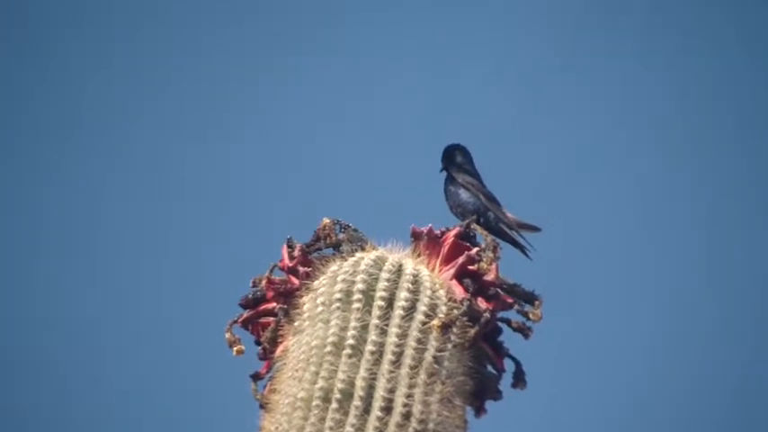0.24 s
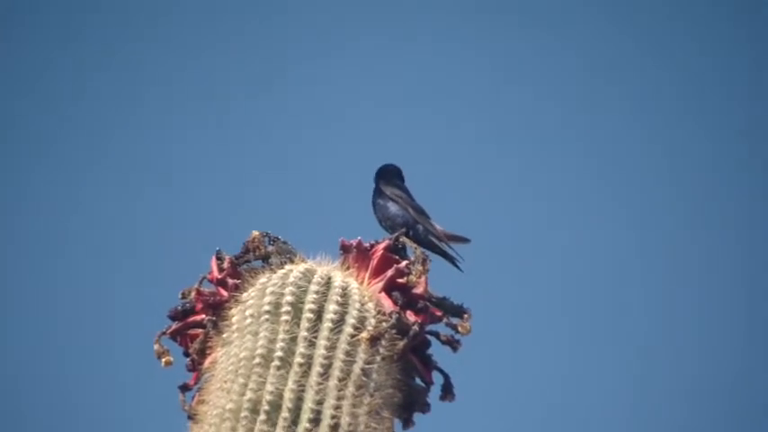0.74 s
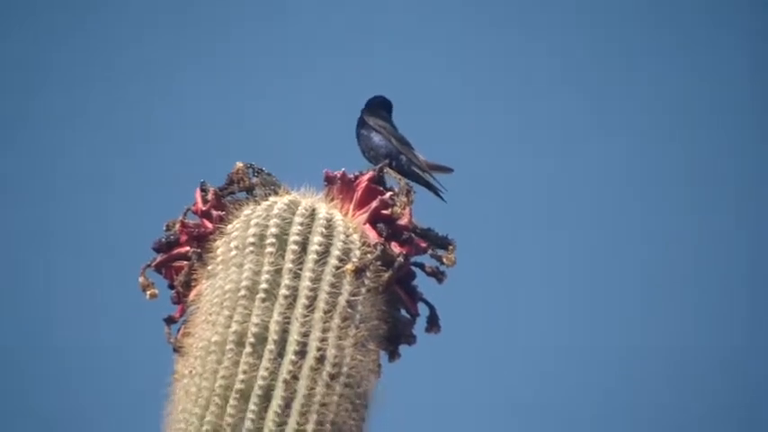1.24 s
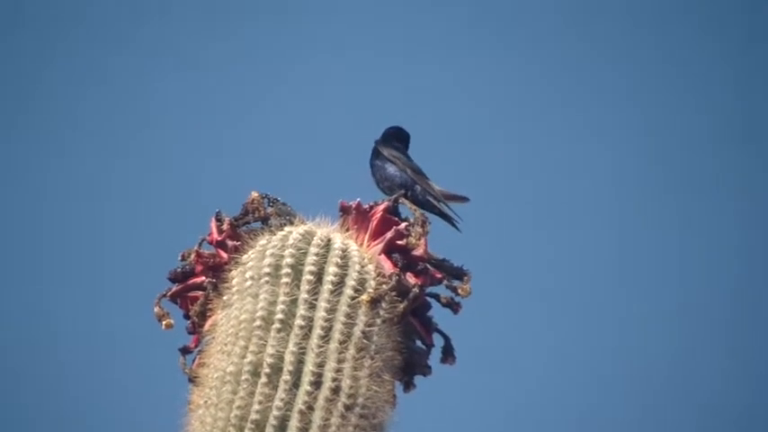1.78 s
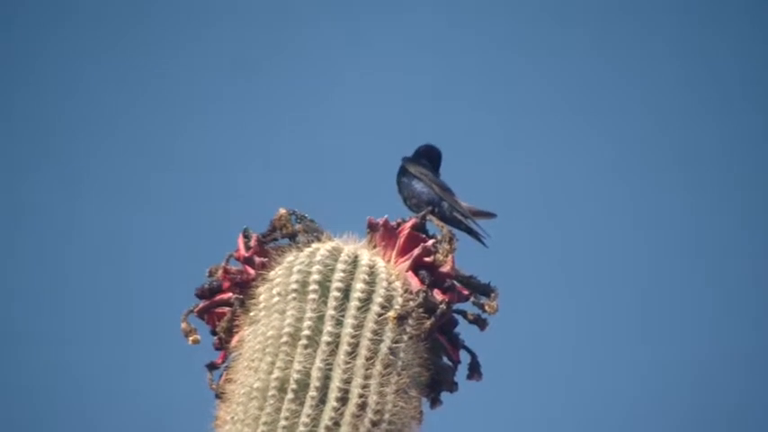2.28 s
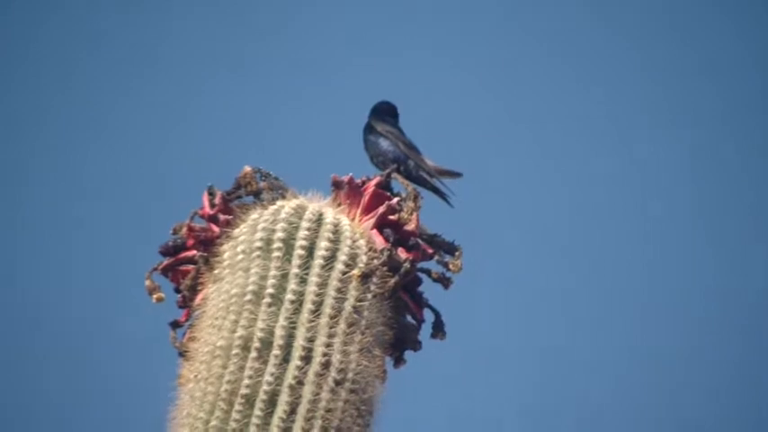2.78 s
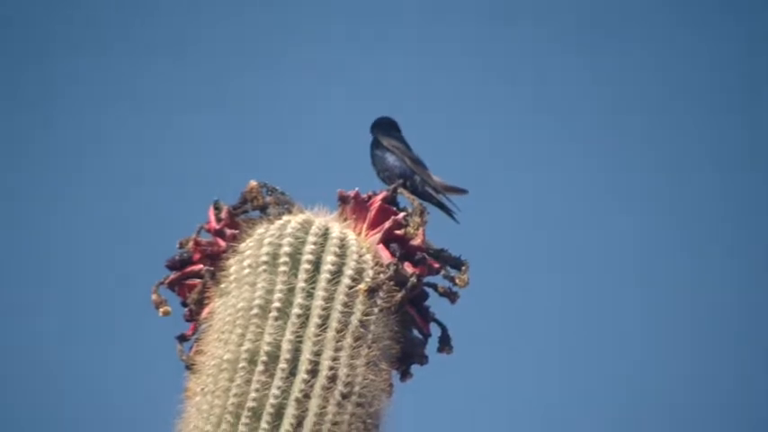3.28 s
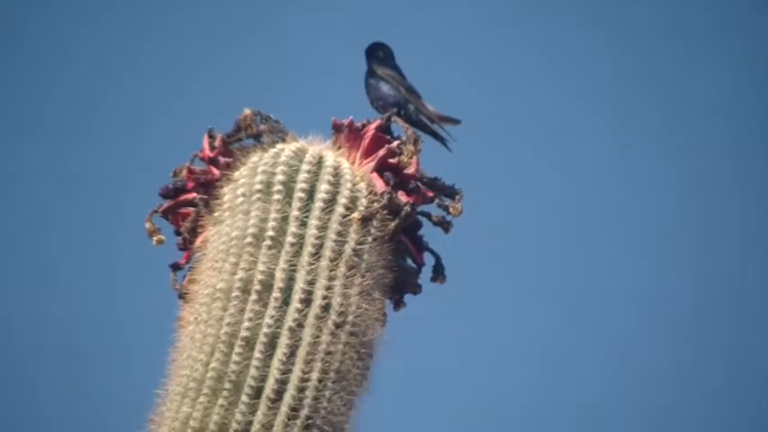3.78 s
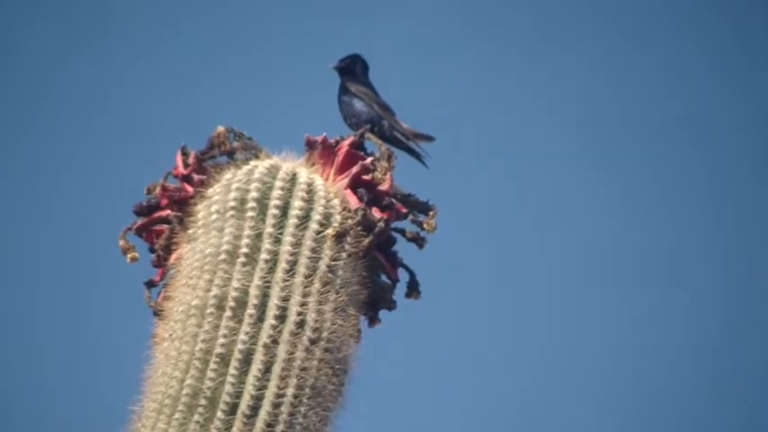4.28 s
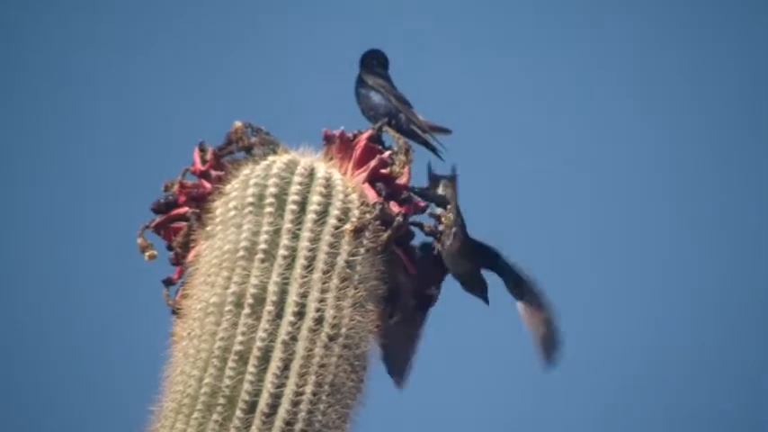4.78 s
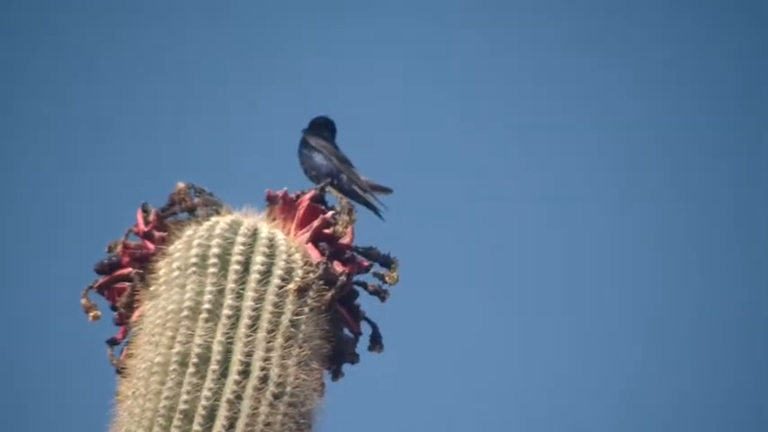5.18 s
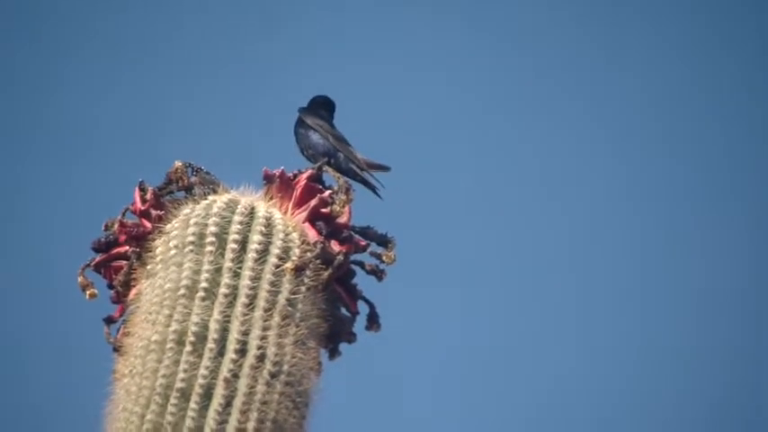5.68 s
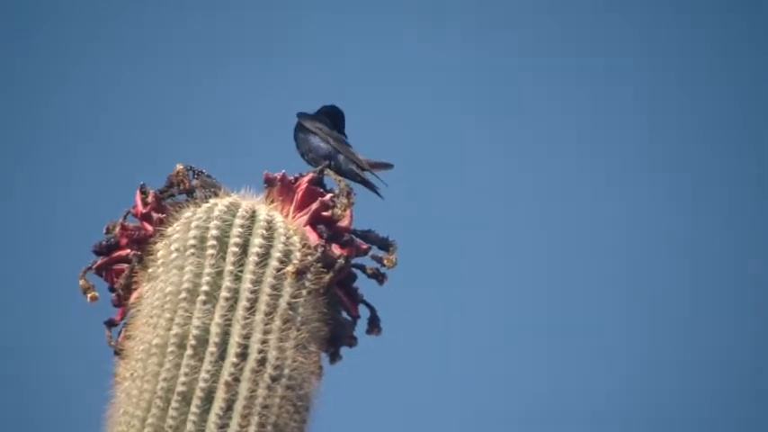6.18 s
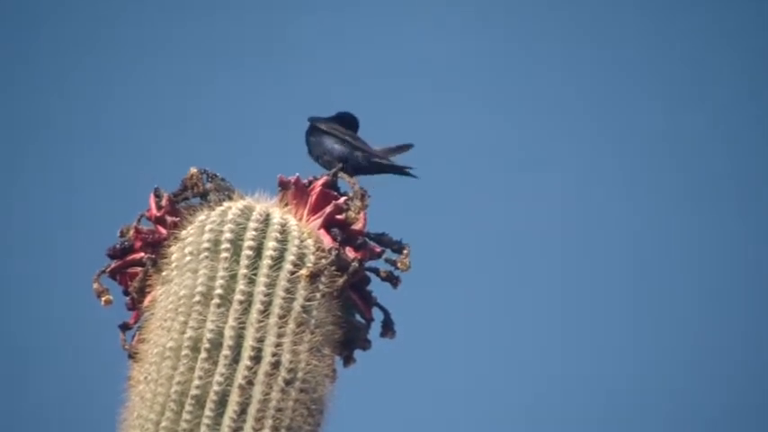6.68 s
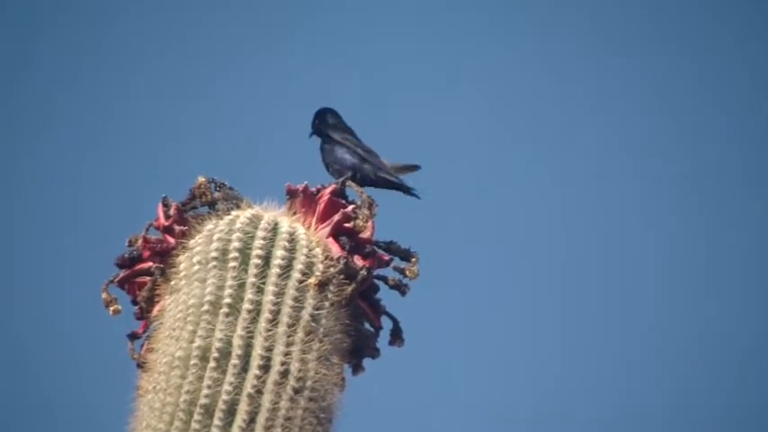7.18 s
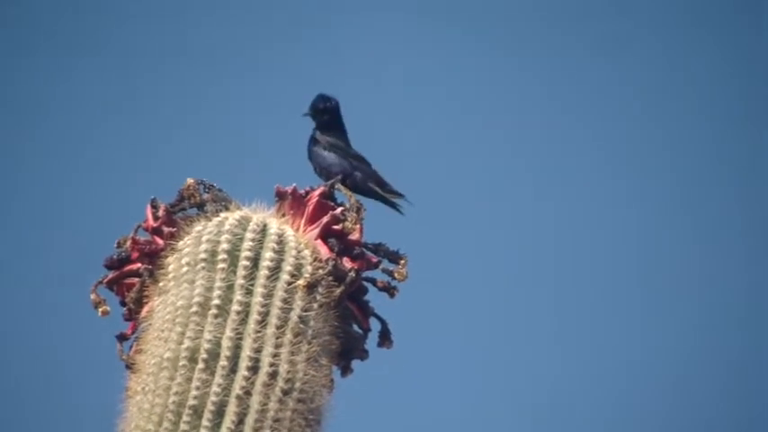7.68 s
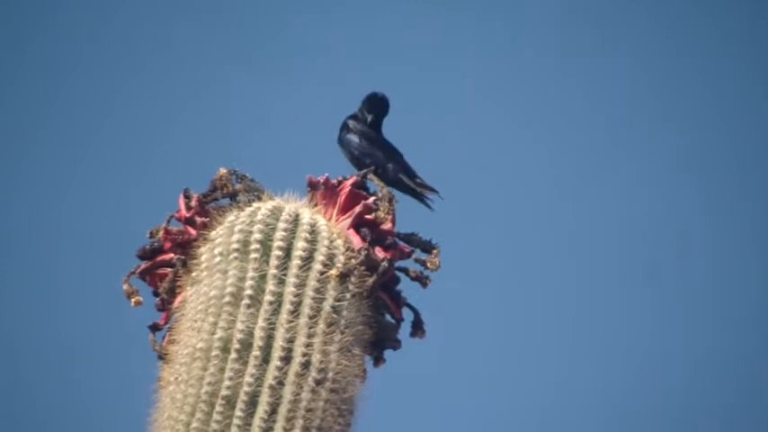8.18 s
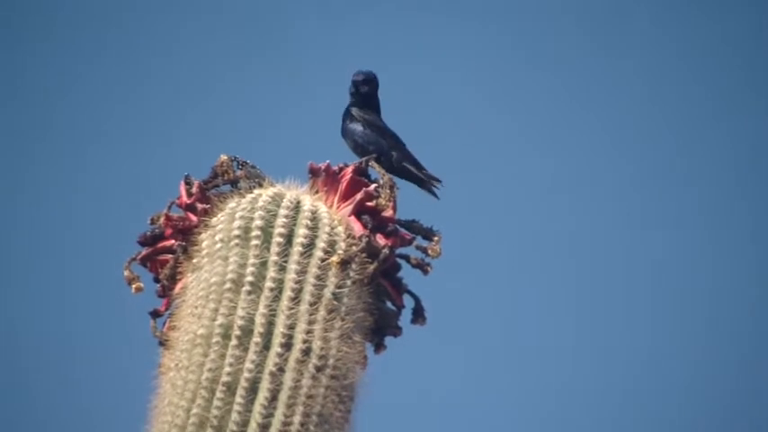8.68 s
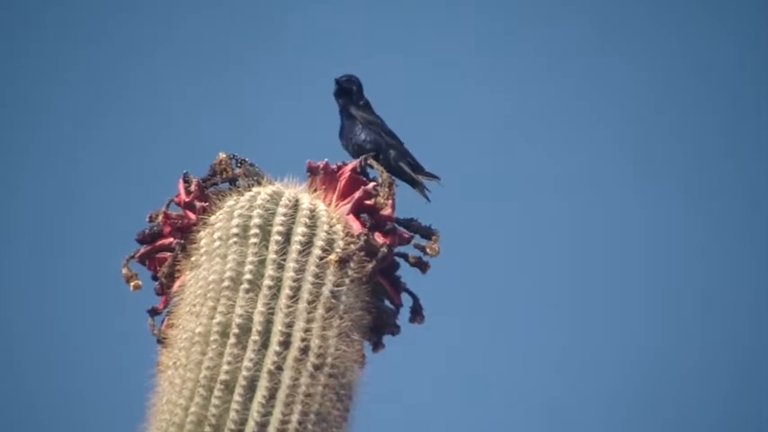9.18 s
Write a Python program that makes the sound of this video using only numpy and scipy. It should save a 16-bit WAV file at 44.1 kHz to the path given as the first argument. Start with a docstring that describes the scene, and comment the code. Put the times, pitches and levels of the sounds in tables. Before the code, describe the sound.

Wind puffs and soft dove coos open over airy outdoor hiss; a distant martin repeats its phrase, then a close martin sings gurgling chirps and whistles.

```python
"""In the open, on a tall cactus, a purple martin sings gurgling chirps, runs of fast falling sweeps and slurred
whistles; each is a gliding tone whose harmonics pass through fixed throat resonances.
Further off a second martin repeats one phrase with more echo, small birds pip and glide, and a dove coos softly,
all on gliding tones. A bill snaps, first very faintly, as a click ringing a few damped tones.
Puffs of wind hit the microphone at first as low noise; wavering tones of distant engines hum under noisy open air."""
import sys
import numpy as np
from scipy import signal
from scipy.fft import rfft, irfft
from scipy.io import wavfile
from scipy.ndimage import uniform_filter1d

SR = 44100
rng = np.random.default_rng(int(sys.argv[2]) if len(sys.argv) > 2 else 0)


def dump(signal):
    """Clip the signal to [-1, 1] and save it as 16-bit WAV at the path in sys.argv[1]."""
    limited = np.clip(np.atleast_2d(signal).T, -1, 1)
    pcm = np.round(limited * 32767).astype(np.int16)
    wavfile.write(sys.argv[1], SR, pcm)


N = 416744

# A note's shape is always (length [s], start pitch [Hz], middle pitch [Hz], end pitch [Hz], fade over the note [dB]).
# Levels of martin notes are those before the throat colours them.

# resonances of throat and open bill: (frequency [Hz], gain [dB])
THROAT = [(1250, -16.5), (1520, -11.5), (2050, -4.5), (2500, -3), (2900, -1), (3250, -2.5), (3600, -5.5),
          (4100, -11), (4800, -16), (5500, -27), (6400, -23), (8000, -23.5), (9700, -14), (12000, -28.5),
          (14000, -14), (15800, -18)]
# slurred whistles: (overtones at the start [dB], overtones at the end [dB],
# curve of (time [s], pitch [Hz], level [dB]))
WHISTLES = [ (-6, -8, [(8.842, 2340, -35), (8.851, 2140, -20.5), (8.868, 1810, -22.5), (8.877, 1520, -34)]),
            (-16.5, 6, [(8.9705, 2350, -25), (8.981, 2050, -18.5), (8.992, 1830, -17), (9.005, 1654, -19.5),
            (9.03, 1520, -36), (9.053, 1467, -21), (9.068, 1387, -20), (9.082, 1140, -33)]),
            (-5, -12, [(9.1575, 2000, -16.5), (9.1615, 1820, -27)]), (-9, -5, [(9.206, 1997, -22),
            (9.217, 2184, -20), (9.233, 2276, -18), (9.25, 2270, -18), (9.263, 2185, -35),
            (9.277, 2230, -49)]), (-5, -20, [(9.301, 2840, -40), (9.321, 2770, -15), (9.335, 2605, -16.5),
            (9.35, 2324, -14), (9.368, 1980, -17), (9.396, 1888, -15), (9.408, 2020, -29)])]

# churrs, runs that slow down and swell:
# (time [s], level [dB], first sweep against it [dB], overtones [dB], pitch ratio)
CHURRS = [(6.136, -25.5, -13, -19, .96), (6.378, -23.5, -12, -17, 1.003), (7.0751, -18, -10, -15.5, 1.02)]
CHURR_FIRST, CHURR_LAST = (.0085, 2520, 2020, 1450, 3), (.039, 2640, 1990, 1690, -7)
# shape of the note that closes a churr
CHURR_CLOSE = (.03, 2520, 2210, 2020, 13)
CLOSE_AFTER_S, CLOSE_DB, CLOSE_OVERTONES_DB = .1052, -2, 5.5  # both levels relative to the churr

# buzzes, a lead-in slur and a fast even run: (time of the run [s], level [dB], overtones [dB])
BUZZES = [(6.6877, -27.5, -18), (6.8975, -22.5, -21), (7.4382, -21, -12.5)]
BUZZ_FIRST, BUZZ_LAST = (.0085, 2720, 2220, 1680, -6), (.01, 2700, 2280, 1600, -2)
BUZZ_LEAD, LEAD_BEFORE_S, LEAD_DB = (.018, 2780, 2630, 2020, -11), .0185, -9.5

# the chatter, three steep sweeps that run on into two long, flatter slides
CHATTER_S, CHATTER_DB, CHATTER_OVERTONES_DB = 8.2736, -15.5, -5
CHATTER_FIRST, CHATTER_LAST = (.0152, 4080, 2820, 1220, 21), (.02, 3560, 2680, 1120, 7)
SLIDE_AFTER_S, SLIDE_DB, SLIDE_OVERTONES_DB = .0434, -18, -4
SLIDE_FIRST, SLIDE_LAST = (.026, 3240, 2874, 2060, 2), (.043, 3177, 2500, 1860, 20)

# chirps, a straight fall from one side of the syrinx (voice organ) and a curved one from the other:
# (time [s], top pitch [Hz], level [dB], fade [dB],
# delay of second fall [s], its final pitch [Hz], its level [dB], its fade [dB])
CHIRPS = [(7.9648, 4290, -18, 13, .038, 1890, -16.7, 8.5),
          (8.5423, 4150, -12.3, 24, .0376, 1910, -14.2, 10), (8.7566, 3160, -17.3, 13, .031, 1550, -18, 17)]
FALL_S, FALL_END_HZ, FALL_OVERTONES_DB = .049, 1430, -6
CURVE_S, CURVE_TOP_HZ, CURVE_OVERTONES_DB = .066, 3620, -3.5
CURVE_SAG = .205  # share of the pitch drop still left at half time

# the far martin's two-voiced opening: (time after the phrase starts [s], relative level [dB], shape)
OPENING = [(0, -.5, (.0508, 2546, 2045, 1980, 14)), (.008, -9, (.044, 3130, 3095, 2950, -2))]
# its gurgle, sung three times: (time after the phrase starts [s], relative level [dB], shape)
GURGLE = [(.075, -7.5, (.023, 2950, 2860, 2650, -3)), (.094, -12, (.022, 3780, 3600, 3300, 2)),
          (.097, 0, (.018, 2570, 2320, 1720, 0)), (.11, -5, (.02, 1850, 1650, 2100, 0)),
          (.127, -3.5, (.012, 2300, 2440, 2420, 0))]
GURGLE_EVERY_S = .066  # before the phrase is stretched
# repeats of the phrase: (time [s], level [dB], stretch of the note starts [ratio])
REPEATS = [(.42, -46.5, 1.03), (1.292, -47, 0.99), (2.18, -45.5, 0.95), (3.18, -46.5, 1.02),
           (4.456, -46, 0.98)]
# a small bird's pips: (time [s], level [dB])
PIPS = [(1.483, -54), (1.584, -47.5), (1.701, -49.5), (5.437, -53), (5.736, -48), (5.936, -47.5),
        (6.055, -48.5), (6.972, -47.5), (7.222, -46), (7.339, -49), (7.457, -48), (8.441, -48.5)]
# shape of every pip
PIP = (.0072, 4040, 3900, 3760, 0)
# distant gliding calls, rising or falling:
# (time [s], length [s], start pitch [Hz], end pitch [Hz], level [dB], fade [dB])
GLIDES = [(.792, 0.03, 2930, 3800, -56, 3), (1.869, .019, 2660, 3030, -55, 4),
          (1.999, .033, 3070, 3900, -53, 4), (4.109, .07, 2720, 2080, -62, -2),
          (4.503, .029, 3000, 3850, -57, -6), (5.935, .11, 3350, 2740, -55.5, 17),
          (7.699, .063, 2910, 2146, -53.5, -8)]

# the dove's coos: (time [s], length [s], pitch it scoops up towards [Hz], level [dB])
COOS = [(0.099, 0.51, 464, -36.5), (1.086, 0.65, 461.5, -36), (1.678, 0.47, 418, -59),
        (2.1, 0.456, 458, -55.5)]
COO_SCOOP_HZ, COO_SCOOP_S, COO_SINK_HZ, COO_FADE_DB = 32, 0.024, 24, 11.5

# bill snaps: (time [s], level [dB])
SNAPS = [(2.862, -60.5), (4.673, -42.5)]
# the snap's resonances: (frequency [Hz], time to fall by 60 dB [s], relative level [dB])
SNAP_MODES = [(1170, 0.016, 10.5), (1600, 0.0089, 12), (2300, 0.0062, -3), (3000, 0.0069, -1),
              (4100, .011, 9.5), (6000, 0.0066, -17), (8050, 0.0065, 2)]

# echoes from near surfaces: (delay [s], level [dB])
ECHOES = [(.0016, -27), (.006, -27), (.0067, -11.5), (.0098, -25), (0.017, -54), (0.029, -40), (.0315, -29)]

# wind puffs on the microphone, each a quick swell that dies away:
# (time of the peak [s], time to fall by 20 dB [s], level [dB], upper edge [Hz])
PUFFS = [(.01, 0.3, -35, 122), (.177, 0.28, -20.5, 80.4), (.635, 0.17, -31, 129), (.712, 0.28, -19.5, 128),
         (.85, 0.03, -29.5, 140), (.935, .06, -27.5, 170), (1.06, 0.1, -29.5, 95), (1.19, 0.1, -33.5, 100),
         (1.3, 0.3, -34, 75), (1.384, .09, -31, 100)]
PUFF_RISE_S = .03
PORTS_SHARE = 0.3  # strength of the eddies common to both ports

# distant engines, one curve each: (time [s], pitch [Hz], level [dB])
ENGINES = [
    [(0, 143, -64), (2.5, 145.3, -52), (4.2, 144.4, -51.5), (6.2, 145.5, -60), (9.45, 149.4, -54)],
    [(3.9, 250.5, -65), (5, 254.7, -60.5), (6.3, 256, -63), (7.3, 260.8, -58), (7.9, 262, -75)],
    [(2.9, 181, -52), (3.3, 180.5, -53.5), (5.2, 172.7, -69), (6, 174, -48), (6.9, 172.5, -51),
     (7.8, 177.1, -52), (8.6, 174.9, -49.5), (9.45, 174.9, -46.5)],
]

# colour of the open air: (frequency [Hz], relative level per Hz [dB])
AIR = [(15, -20), (25, -7), (45, -2), (75, 0), (110, -3.5), (150, -6), (200, -11), (270, -14), (430, -20),
       (700, -21.5), (1100, -26), (1700, -28.5), (5200, -31), (15800, -36.5)]
# how alike left and right are in the air sound: (frequency [Hz], likeness [0-1])
LIKENESS = [(30, .02), (120, 1), (400, 0.25), (1500, 0.13), (5000, 0.044), (15000, 0.14)]
AIR_DB = -45.33  # of the part common to left and right

TOP_HZ = 15850


def undb(db):
    """Turn decibels into a gain."""
    return 10 ** (np.asarray(db) / 20)


def along(t, table):
    """Read the columns of a curve at times t."""
    s, *columns = np.transpose(table)
    return [np.interp(t, s, column) for column in columns]


def at_pitch(hz, table):
    """Read a spectrum on a log-frequency axis, as the ear spaces pitches."""
    table_hz, value = np.transpose(table)
    return np.interp(np.log(np.maximum(hz, 1)), np.log(table_hz), value)


def unit(x):
    """Scale to an average strength (rms) of 1."""
    return x / np.sqrt(np.mean(x ** 2))


def band(x, low_hz, high_hz, order=2):
    """Keep only the frequencies between two edges."""
    edges = [low_hz, min(high_hz, .45 * SR)]
    return signal.sosfilt(signal.butter(order, edges, "band", fs=SR, output="sos"), x)


def walk(rate, n):
    """Smooth random drift with a spread near 1; rate is its steps per second."""
    k = max(int(SR / rate), 2)
    steps = np.repeat(rng.standard_normal(n // k + 1), k)
    return 1.34 * uniform_filter1d(uniform_filter1d(steps, k), k)[:n]


def add(out, s, x):
    """Mix x into out from time s on, or from the very start if s is negative."""
    i = max(int(s * SR), 0)
    out[..., i:i + x.shape[-1]] += x[..., :max(N - i, 0)]


def gate(u, rise, fall):
    """Rounded start and end of a note whose progress u runs from 0 to 1."""
    return np.sin(np.pi / 2 * np.clip(np.minimum(u / rise, (1 - u) / fall), 0, 1))


def sweep(shape, db, swell=0.27, release=0.12):
    """Pitch and strength of one curved glide; it swells more slowly than it stops."""
    length, start_hz, middle_hz, end_hz, fade_db = shape
    u = np.linspace(0, 1, max(int(length * SR), 16))
    bend = np.polyfit([0, .5, 1], [start_hz, middle_hz, end_hz], 2)
    strength = gate(u, swell, release) ** 2 * undb(db - fade_db * (u - .5))
    return np.polyval(bend, u), strength


def slur(table, edge_s):
    """Pitch and strength of a held note that follows a curve."""
    t = np.arange(table[0][0], table[-1][0], 1 / SR)
    hz, db = along(t, table)
    edge = edge_s * SR / len(t)
    strength = gate(np.linspace(0, 1, len(t)), edge, edge) * undb(db)
    return uniform_filter1d(hz, size=300), strength


def tone(hz, strength):
    """A pure tone on a moving pitch."""
    return strength * np.sin(2 * np.pi * np.cumsum(hz) / SR)


def martin():
    """The near bird: sweeps and whistles, brighter where its overtones are stronger."""
    out = np.zeros(N)
    for s, shape, db, overtones_db in [*churrs(), *buzzes(), *chatter(), *chirps()]:
        hz, strength = let_go(*sweep(shape, db))
        add(out, s, syrinx(hz, strength, overtones_db))
    for start_db, end_db, curve in WHISTLES:
        hz, strength = slur(curve, edge_s=0.00082)
        overtones_db = np.linspace(start_db, end_db, len(hz))
        add(out, curve[0][0], syrinx(hz, strength, overtones_db))
    return out


def syrinx(hz, strength, overtones_db, jitter=0.002, flutter_db=1.23, slope=0.87, patchy_db=3, count=10):
    """A slightly unsteady membrane; its harmonics waver as they slide through the throat's resonances."""
    hz = hz * (1 + jitter * walk(700, len(hz)))
    strength = strength * undb(flutter_db * walk(348, len(hz)))
    out = 0
    for k in range(1, count + 1):
        source = 1
        if k > 1:
            source = undb(overtones_db + patchy_db * walk(146, len(hz))) / k ** slope
        throat = undb(at_pitch(k * hz, THROAT))
        audible = k * hz < SR / 2  # leave out what the sample rate cannot carry
        out = out + tone(k * hz, strength * source * throat * audible)
    return out


def let_go(hz, strength, droop=0.17, rasp=0.049):
    """As the air pressure falls at the end of a sweep, the pitch sags and turns raspy."""
    slack = np.linspace(0, 1, len(hz)) ** 5
    return hz * (1 - droop * slack + rasp * np.sqrt(slack) * walk(900, len(hz))), strength


def trill(s, db, overtones_db, first, last, count, gap_s, slowing, onset_db, loudest, scatter=0.011):
    """A run of sweeps turning from one shape into another; effort sets both loudness and brightness."""
    first, last = np.array(first), np.array(last)
    for k, u in enumerate(np.linspace(0, 1, count)):
        shape = first + u * (last - first)
        shape[0] = first[0] * (last[0] / first[0]) ** u  # lengths change by a steady ratio
        shape[1:4] *= 1 + scatter * rng.standard_normal(3)
        # effort is onset_db at the start and 0 dB where u reaches loudest
        effort_db = onset_db * (1 - u / loudest) ** 2
        yield s, shape, db + effort_db, overtones_db + effort_db
        s = s + gap_s * slowing ** k


def churrs():
    """Five ever longer, louder sweeps and a closing note."""
    for s, db, onset_db, overtones_db, pitch in CHURRS:
        first, last = np.array([CHURR_FIRST, CHURR_LAST]) * [1, pitch, pitch, pitch, 1]
        yield from trill(s, db, overtones_db, first, last, count=5, gap_s=.0152, slowing=1.15,
                         onset_db=onset_db, loudest=1.05, scatter=.025)
        yield s + CLOSE_AFTER_S, CHURR_CLOSE, db + CLOSE_DB, overtones_db + CLOSE_OVERTONES_DB


def buzzes():
    """A soft slur leads into six quick sweeps, with most effort near the middle."""
    for s, db, overtones_db in BUZZES:
        yield s - LEAD_BEFORE_S, BUZZ_LEAD, db + LEAD_DB, overtones_db
        yield from trill(s, db, overtones_db, BUZZ_FIRST, BUZZ_LAST, count=6, gap_s=.0097, slowing=1,
                         onset_db=-9.5, loudest=.57, scatter=.025)


def chatter():
    """A loud, hard rattle that slows into two overlapping slides."""
    yield from trill(CHATTER_S, CHATTER_DB, CHATTER_OVERTONES_DB, CHATTER_FIRST, CHATTER_LAST, count=3,
                     gap_s=.014, slowing=1.08, onset_db=-3.5, loudest=.55, scatter=.005)
    yield from trill(CHATTER_S + SLIDE_AFTER_S, SLIDE_DB, SLIDE_OVERTONES_DB, SLIDE_FIRST, SLIDE_LAST,
                     count=2, gap_s=.019, slowing=1, onset_db=1.2, loudest=1, scatter=.002)


def chirps():
    """Two overlapping falls; the second has stronger overtones and levels out."""
    for s, top_hz, db, fade_db, after, end_hz, second_db, second_fade_db in CHIRPS:
        straight = (FALL_S, top_hz, (top_hz + FALL_END_HZ) / 2, FALL_END_HZ, fade_db)
        yield s, straight, db, FALL_OVERTONES_DB
        middle_hz = end_hz + CURVE_SAG * (CURVE_TOP_HZ - end_hz)
        curved = (CURVE_S, CURVE_TOP_HZ, middle_hz, end_hz, second_fade_db)
        yield s + after, curved, second_db, CURVE_OVERTONES_DB


def far_martin():
    """A second martin repeats its phrase; pitch and force vary a little from note to note."""
    out = np.zeros(N)
    phrase = list(OPENING)
    for k in range(3):
        phrase += [(after + k * GURGLE_EVERY_S, db, shape) for after, db, shape in GURGLE]
    for s, db, stretch in REPEATS:
        for after, note_db, shape in phrase:
            hz, strength = sweep(shape, note_db)
            detune, force = rng.standard_normal(2)
            hz = hz * (1 + 0.0158 * detune)
            strength = strength * undb(db + 0.92 * force)
            note = syrinx(hz, strength, overtones_db=-8, jitter=.011, flutter_db=2.5)
            add(out, s + after * stretch, note)
    return out


def small_birds():
    """Short pips and gliding calls, all pure tones."""
    out = np.zeros(N)
    for s, db in PIPS:
        add(out, s, tone(*sweep(PIP, db)))
    for s, length, start_hz, end_hz, db, fade_db in GLIDES:
        shape = (length, start_hz, np.sqrt(start_hz * end_hz), end_hz, fade_db)
        add(out, s, tone(*sweep(shape, db)))
    return out


def dove():
    """Soft, nearly pure coos that scoop up to pitch, then sink and fade."""
    out = np.zeros(N)
    for s, length, top_hz, db in COOS:
        t = np.arange(int(length * SR)) / SR
        u = t / length
        hz = top_hz - COO_SCOOP_HZ * np.exp(-t / COO_SCOOP_S) - COO_SINK_HZ * u ** 3
        hz = hz * (1 + 0.0028 * walk(61, len(hz)))
        strength = gate(u, rise=0.17, fall=0.18) * undb(db - COO_FADE_DB * u ** 3)
        strength = strength * undb(0.23 * walk(35, len(hz)))
        add(out, s, tone(hz, strength))
    return out


def snap():
    """A bill snaps: a sharp contact and a brief rattle ring a few damped tones, under a noisy crack."""
    t = np.arange(SR // 20) / SR
    contact = 0.29 * rng.standard_normal(len(t)) * np.exp(-t / 0.0029)
    contact[0] += 1
    modes = sum(undb(db - 60 * t / t60) * np.sin(2 * np.pi * hz * t) for hz, t60, db in SNAP_MODES)
    ring = unit(signal.fftconvolve(contact, modes)[:len(t)])
    crack = rng.standard_normal(len(t)) * (t / .0011) * np.exp(-t / 0.0012)
    crack = unit(band(crack, 1000, 5100, order=1))
    click = unit(band(ring + 0.73 * crack, 950, 10000, order=5))
    out = np.zeros(N)
    for s, db in SNAPS:
        add(out, s, undb(db) * click)
    return out


def wind():
    """Low eddies at the two microphone ports, partly shared."""
    out = np.zeros((2, N))
    t = np.arange(SR) / SR
    for s, fall_s, db, edge_hz in PUFFS:
        noise = rng.standard_normal((3, SR))
        eddy = unit(band(noise[:2] + PORTS_SHARE * noise[2], 11.4, edge_hz, order=3))
        rise = np.minimum(t / PUFF_RISE_S, 1) ** 2
        fall_db = 20 * np.maximum(t - PUFF_RISE_S, 0) / fall_s
        add(out, s - PUFF_RISE_S, eddy * rise * undb(db - fall_db))
    return out


def engines():
    """Distant motors drone as single tones; their level wavers separately left and right."""
    out = np.zeros((2, N))
    for engine in ENGINES:
        hz, strength = slur(engine, edge_s=0.24)
        hum = tone(hz * (1 + 0.0028 * walk(6.3, len(hz))), strength)
        waver_db = [1.3 * walk(4.8, len(hz)) for _ in range(2)]
        add(out, engine[0][0], hum * undb(waver_db))
    return out


def air():
    """Low far rumble under a smooth hiss, only partly alike left and right."""
    hz = np.arange(N // 2 + 1) * SR / N
    likeness = np.clip(at_pitch(hz, LIKENESS), 0, .99)
    mid, side = rfft(rng.standard_normal((2, N))) * undb(at_pitch(hz, AIR))
    mid = irfft(mid, N)
    # the less alike the two sides, the stronger their difference
    side = irfft(side * np.sqrt((1 - likeness) / (1 + likeness)), N)
    both = mid + np.array([[1], [-1]]) * side
    return both / mid.std() * undb(AIR_DB + 0.1 * walk(2.87, N))


def outdoors(x, scatter_db, tail_db, scatter_t60=0.13, tail_t60=1.9, spread=0.42):
    """Sharp near echoes, a short scatter from ground and brush, and a faint long tail."""
    t = np.arange(SR) / SR
    near = np.zeros(SR)
    for delay, db in ECHOES:
        near[int(delay * SR)] += undb(db)
    noise = rng.standard_normal((3, SR))
    # diffuse sound reaches the two ports a little differently
    noise = noise[0] + spread * noise[1:]
    scatter = band(noise, 1000, 8400) * undb(-60 * t / scatter_t60) * (t > .004)
    tail = band(noise, 1730, 3300) * undb(-60 * t / tail_t60) * (1 - np.exp(-t / 0.015))
    diffuse = undb(scatter_db) * unit(scatter) + undb(tail_db) * unit(tail)
    response = near + diffuse / np.sqrt(SR)
    return x + signal.fftconvolve(x[None], response, axes=1)[:, :N]


def scene():
    """The martin is almost straight ahead; the further birds come with a stronger echo tail."""
    balance = undb(np.array([[-.2], [.2]]))  # left and right
    near = outdoors(martin(), scatter_db=-11.0, tail_db=-32.0) * balance
    far = outdoors(far_martin() + small_birds(), scatter_db=-14, tail_db=-14)
    click = outdoors(snap(), scatter_db=-20, tail_db=-32)
    return near + far + click + dove() + wind() + engines() + air()


def record(dry):
    """A steep low-pass filter cuts the top of the treble."""
    return signal.sosfilt(signal.ellip(10, .1, 80, TOP_HZ, fs=SR, output="sos"), dry)


dry = scene()
out = record(dry)
dump(out)
```